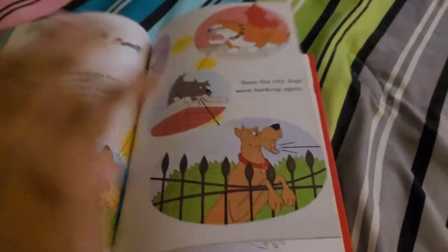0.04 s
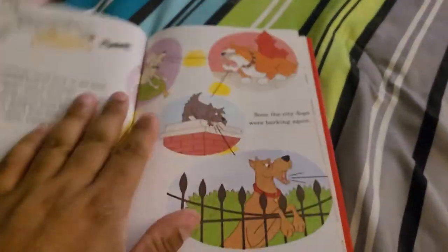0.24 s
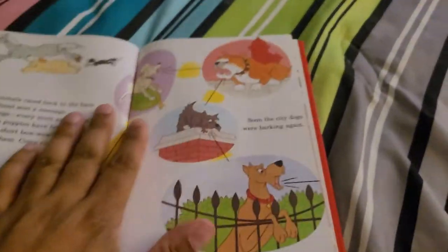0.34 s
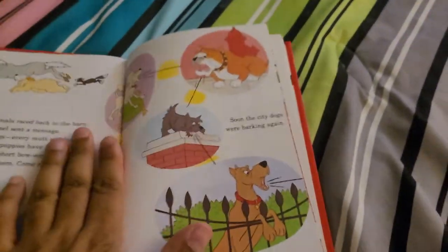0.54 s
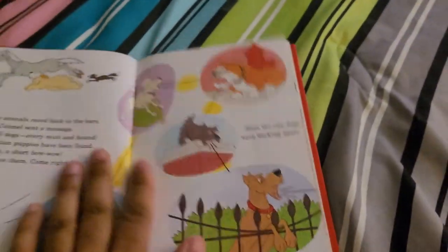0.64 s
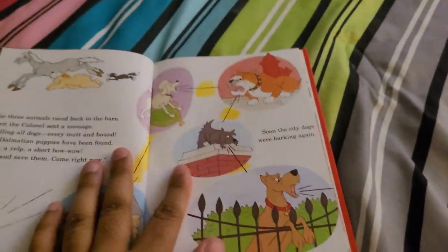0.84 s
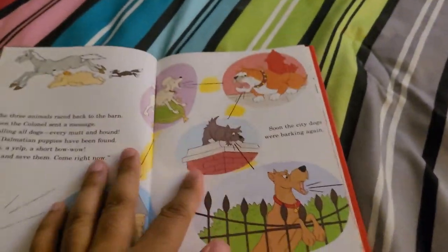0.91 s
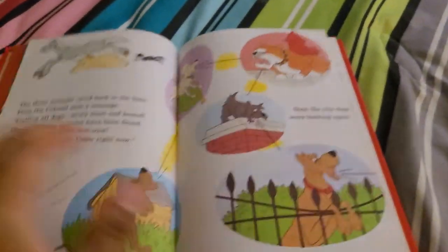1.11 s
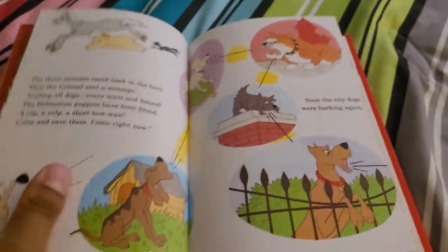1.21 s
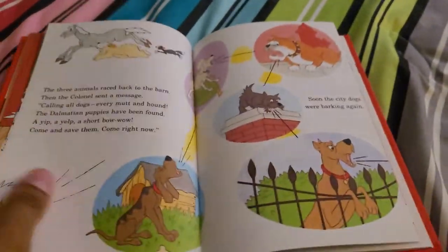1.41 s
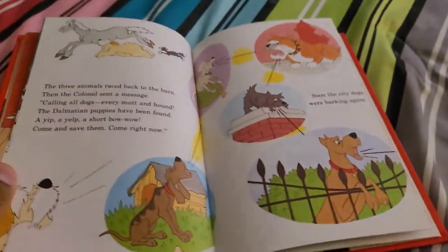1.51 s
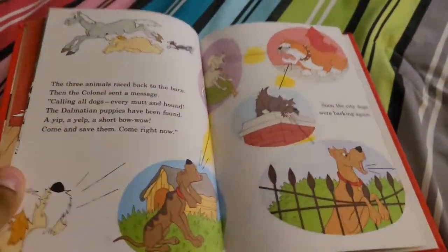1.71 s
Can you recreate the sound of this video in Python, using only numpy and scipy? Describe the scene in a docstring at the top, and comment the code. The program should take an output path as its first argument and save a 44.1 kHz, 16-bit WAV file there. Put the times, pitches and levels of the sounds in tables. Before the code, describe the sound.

Close stereo sound of a book page being turned on a bed: brief paper hiss, one loud bright snap, soft rubbing strokes, then a light papery flex and muffled thumps, over faint room noise with a low hum.

```python
"""A small quiet room, heard from close by: a stiff page of a hardcover book lying on a bed is turned.
It slides, buckles, snaps over and flops down; a hand smooths it in two strokes, then lets go;
the page springs up and the book bumps on the bedding. Snap, ticks and bumps are filtered impulses
and dying sines, flexes are bursts of tiny clicks, and sliding, rubbing, rocking and background
are shaped noise."""
import sys
import numpy as np
from scipy import signal
from scipy.fft import rfft, irfft
from scipy.io import wavfile
from scipy.ndimage import uniform_filter1d, minimum_filter1d

SR = 44100
rng = np.random.default_rng(int(sys.argv[2]) if len(sys.argv) > 2 else 0)


def file_out(sig):
    """Save sig as 16-bit WAV at sys.argv[1]."""
    # one column per channel
    cols = np.atleast_2d(sig).T
    # limit, then scale
    lim = np.clip(cols, -1, 1)
    pcm = np.round(lim * 32767).astype(np.int16)
    wavfile.write(sys.argv[1], SR, pcm)


N = 77175
T = np.arange(N) / SR
CUTOFF_HZ = 16100


def from_db(db):
    """Decibels to gain."""
    return 10 ** (np.asarray(db) / 20)


def rms_one(x):
    """Scale to rms 1."""
    return x / np.sqrt(np.mean(x ** 2) + 1e-20)


def peak_at(x, db):
    """Scale to a peak level."""
    return from_db(db) * x / np.abs(x).max()


def at_hz(points, hz):
    """Read a spectrum on a log-frequency axis."""
    point_hz, value = np.transpose(points)
    return np.interp(np.log(hz + 1), np.log(point_hz), value)


def level(rows):
    """Level curve as gain over time."""
    return from_db(np.interp(T, *np.transpose(rows)))


def flicker(rate_hz):
    """Random drift of spread 1: noise averaged over 1 / rate_hz."""
    size = max(int(SR / rate_hz), 1)
    return rms_one(uniform_filter1d(rng.standard_normal(N), size, mode="wrap"))


def band(x, hz, width):
    """Broad resonance from hz / width to hz * width."""
    width = max(width, 1.05)
    edges_hz = [hz / width, min(hz * width, SR * .45)]
    return signal.sosfilt(signal.butter(2, edges_hz, "band", fs=SR, output="sos"), x + 1e-18)


def click(start_s):
    """Unit impulse."""
    return 1.0 * (np.arange(N) == int(start_s * SR))


def ring(start_s, hz, t60_s):
    """Sine that starts at start_s and decays 60 dB per t60_s."""
    age_s = np.maximum(T - start_s, 0)
    return np.sin(2 * np.pi * hz * age_s) * from_db(-60 * age_s / t60_s)


def grains(rate_per_s, spread_db):
    """Random tiny clicks of uneven size and sign; rms 1."""
    sizes = from_db(spread_db * np.minimum(rng.exponential(1, N), 4))
    signs = rng.choice([-1, 1], N)
    return rms_one(sizes * signs * (rng.random(N) < rate_per_s / SR))


# left-right likeness of the noises: (frequency [Hz], correlation [0..1])
LIKENESS = [(100, 0.89), (400, .88), (1200, 0.27), (2500, 0.38), (5000, 0.18), (13000, 0.15)]


def spread(pair, spectrum):
    """Colour two unrelated excitations and mix them into partly alike channels; rms 1."""
    hz = np.fft.rfftfreq(N, 1 / SR)
    mid, side = rfft(pair)
    alike = np.clip(at_hz(LIKENESS, hz), 0, 1)
    sign = np.array([[1], [-1]])
    gain = from_db(at_hz(spectrum, hz)) * (hz > 34) * (hz < CUTOFF_HZ)
    channels = np.sqrt(1 + alike) * mid + sign * np.sqrt(1 - alike) * side
    return rms_one(irfft(gain * channels, N))


# page snap-through, then edge slap: (time [s], peak [dB], pitch [Hz])
SNAPS = [(0.221, 0, 2740), (.2219, -5, 2210)]
# sheet modes ringing after the snap: (frequency [Hz], drive level re snap [dB], t60 [s])
SHEET_MODES = [(925, -40, .11), (1005, -35, .11), (1168, -34, .13), (1660, -34, .11), (1860, -21, .012),
               (2250, -34, .1), (2420, -16, .010), (3400, -21, .011)]
SNAP_WIDTH, SNAP_TOP_HZ = 1.45, 4400
SHEET_HZ, SHEET_WIDTH = 1900, 2.4


def snap():
    """The bent sheet pops through in one short pulse and is left ringing; its edge slaps just after."""
    lowpass = signal.butter(7, SNAP_TOP_HZ, fs=SR, output="sos")
    pulses = 0
    for start_s, peak_db, hz in SNAPS:
        pulse = signal.sosfilt(lowpass, band(click(start_s), hz, SNAP_WIDTH))
        pulses = pulses + peak_at(pulse, peak_db)
    start_s, peak_db, _ = SNAPS[0]
    ringing = sum(from_db(peak_db + mode_db) * ring(start_s, hz, t60_s)
                  for hz, mode_db, t60_s in SHEET_MODES)
    return pulses + band(ringing, SHEET_HZ, SHEET_WIDTH)


# sheet flexes: (time of middle [s], level [dB], pitch [Hz], half length [s])
FLEXES = [(0.1753, -39, 3520, 0.00086), (0.193, -39, 1110, 0.00093), (0.2, -30.5, 1130, 0.0045),
          (0.231, -40, 2350, 0.0023), (0.2469, -28, 1010, 0.0024), (0.263, -39.5, 890, 0.007),
          (.271, -38, 795, 0.0054), (0.659, -42, 1400, 0.0023), (.809, -63, 8100, 0.003),
          (1.223, -60.5, 1490, 0.0075), (1.309, -46.5, 2350, 0.0011), (1.317, -50.5, 1170, 0.0084),
          (1.339, -44.5, 2780, 0.0027), (1.348, -37, 1160, 0.0028), (1.368, -58, 1830, 0.0053),
          (1.404, -51, 2200, 0.031)]
FLEX_WIDTH, FLEX_CLICKS_PER_S, FLEX_SPREAD_DB = 1.564, 4000, 3


def flexing():
    """Each flex is a swell of tiny creases sounding through the sheet."""
    out = 0
    for middle_s, level_db, hz, half_s in FLEXES:
        swell = np.exp(-.5 * ((T - middle_s) / half_s) ** 2)
        burst = band(grains(FLEX_CLICKS_PER_S, FLEX_SPREAD_DB) * swell, hz, FLEX_WIDTH)
        to_swell_energy = np.sqrt(np.sum(swell ** 2) / (np.sum(burst ** 2) + 1e-20))
        out = out + from_db(level_db) * burst * to_swell_energy
    return out


# skin and paper sliding on paper: (time [s], level [dB])
SLIDE = [(0, -42.5), (.045, -42), (.061, -41), (.069, -44.5), (.10, -58), (.122, -59.5), (.143, -51.5),
         (.168, -66.5), (.184, -42.5), (.218, -66), (.232, -41.5), (.29, -46.5), (.375, -54), (.42, -49),
         (.48, -48.5), (.58, -48.5), (.63, -45.5), (.68, -39.5), (.71, -39.5), (.755, -50), (.778, -69.5),
         (.86, -62), (.94, -58.5), (1.01, -56), (1.065, -48.5), (1.14, -51), (1.158, -63), (1.295, -75),
         (1.34, -52.5), (1.435, -59.5), (1.51, -51.5), (1.595, -54), (1.635, -64), (1.75, -64.5)]
# sliding hiss spectrum: (frequency [Hz], density [dB per Hz])
HISS = [(200, -5), (600, -10), (1300, -2.5), (2400, -1.5), (4500, -3), (6500, -7.5), (8000, -5), (9500, -6),
        (12500, 1.5), (15500, -4)]
# treble of the sliding re the rest of it: (time [s], level [dB])
FIZZ = [(.02, -7), (.06, 4), (.11, -23), (.16, 1), (.24, -1), (.28, -1), (.37, -3.5), (.415, 3.5),
        (.50, -8), (.60, -6.5), (.68, 1.5), (.77, -4), (.81, -2), (1.05, 0.5), (1.14, -4.5), (1.28, -3),
        (1.40, -5.5), (1.51, 0.5), (1.62, -6.5)]
FIZZ_ABOVE_HZ = 8800
GRAINS_PER_S, GRAIN_SPREAD_DB, GRAIN_DB, SLIDE_FLICKER_DB = 5500, 5, -4, 0.86


def sliding():
    """Paper fibres catch and slip: fine grains in a smooth hiss, whose fizzy top comes and goes."""
    slips = np.array([grains(GRAINS_PER_S, GRAIN_SPREAD_DB) for _ in range(2)])
    hiss = spread(rng.standard_normal((2, N)) + from_db(GRAIN_DB) * slips, HISS)
    highpass = signal.butter(4, FIZZ_ABOVE_HZ, "high", fs=SR, output="sos")
    top = signal.sosfiltfilt(highpass, hiss)
    fizzy = hiss - top + top * level(FIZZ)
    return fizzy * level(SLIDE) * from_db(SLIDE_FLICKER_DB * flicker(rate_hz=83))


# finger and page-edge ticks: (time [s], peak [dB], pitch [Hz])
TICKS = [(.056, -34, 885), (.0625, -24.5, 12000), (0.1516, -47, 700), (0.1761, -26, 9200),
         (0.176, -31, 1350), (0.185, -47, 3000), (.2005, -39, 1270), (0.327, -45, 1210), (.344, -38, 1200),
         (.430, -39, 1210), (0.495, -35, 1800), (.4993, -33.5, 775), (.850, -38, 7000), (.880, -46, 850),
         (.929, -43.5, 755), (.949, -47, 1010), (1.078, -40, 980), (1.1769, -39.5, 1160),
         (1.219, -43, 1400), (1.3072, -36, 9050), (1.3143, -39, 1380), (1.3475, -40, 1570)]
TICK_WIDTH = 2


def ticks():
    """Single dead contacts, each an impulse through one broad resonance."""
    return sum(peak_at(band(click(start_s), hz, TICK_WIDTH), peak_db) for start_s, peak_db, hz in TICKS)


# page block rumbling under the hand: (time [s], level [dB])
RUB = [(0, -59), (.06, -58), (.11, -63), (.16, -54.5), (.22, -51.5), (.28, -55), (.33, -61), (.39, -59.5),
       (.47, -57), (.57, -52), (.70, -45), (.79, -61.5), (.89, -67.5), (.94, -50.5), (1.07, -57),
       (1.16, -57), (1.26, -64), (1.34, -49), (1.43, -60.5), (1.58, -70.5), (1.75, -68)]
# page block resonances: (frequency [Hz], density [dB per Hz])
BLOCK = [(35, -17), (70, -34), (100, -13), (140, -3), (185, -5), (250, 1.5), (380, -7), (550, -13.5),
         (1000, -17.5), (2500, -45)]


def rubbing():
    """The dragging hand shakes the low resonances of the page block."""
    return spread(rng.standard_normal((2, N)), BLOCK) * level(RUB)


# soft bumps of page and book: (time [s], peak [dB], pitch [Hz])
BUMPS = [(0.2671, -33, 230), (.273, -38, 124), (0.283, -39.5, 53), (0.4982, -40, 290), (0.989, -41.5, 247),
         (1.077, -42, 214), (1.343, -39.5, 138), (1.385, -34.5, 124), (1.399, -35.5, 215), (1.402, -43, 76),
         (1.412, -38, 132)]
BUMP_WIDTH, BUMP_CYCLES = 2.22, 3.06  # cycles per 60 dB of decay


def bumps():
    """Low thuds that the bedding softens and damps within a few cycles."""
    out = 0
    for start_s, peak_db, hz in BUMPS:
        thud = ring(start_s, hz, BUMP_CYCLES / hz)
        out = out + peak_at(band(thud, hz, BUMP_WIDTH), peak_db)
    return out


# book rocking on the bedding: (time [s], level [dB])
ROCK = [(0, -62), (.10, -84), (.20, -52.5), (.23, -54), (.285, -41.5), (.32, -63), (.365, -56.5),
        (.40, -81), (.60, -67), (.66, -70), (.74, -48.5), (.79, -71), (1.18, -83), (1.27, -65.5),
        (1.31, -51), (1.37, -60), (1.41, -40.5), (1.44, -63), (1.51, -56), (1.57, -78), (1.75, -67)]
# bedding rumble spectrum: (frequency [Hz], density [dB per Hz])
BEDDING = [(30, -16), (45, -5), (70, 7), (92, -11.5), (130, 5), (200, -8), (400, -10.5), (1000, -48)]


def rocking():
    """The shifting book presses into the bedding with a deep, muffled rumble."""
    return spread(rng.standard_normal((2, N)), BEDDING) * level(ROCK)


# room tail colour: (frequency [Hz], level [dB])
ROOM = [(60, -18), (300, -14), (1000, 3), (2300, -3), (4000, -7.5), (8000, 3.5), (15000, 4)]
ROOM_DB, ROOM_T60_S, ROOM_DELAY_S = -8, 0.22, .005


def room(x):
    """Short diffuse tail of decaying noise, unrelated at the two microphones."""
    colour = from_db(at_hz(ROOM, np.fft.rfftfreq(N, 1 / SR)))
    noise = irfft(rfft(rng.standard_normal((2, N))) * colour, N)
    tail = noise * (T > ROOM_DELAY_S) * from_db(-60 * T / ROOM_T60_S)
    tail = tail / np.sqrt(np.sum(tail ** 2) / 2)  # mean energy 1 per channel
    return from_db(ROOM_DB) * signal.fftconvolve(x[None], tail, axes=1)[:, :N]


# room noise spectrum: (frequency [Hz], density [dB per Hz])
FLOOR = [(30, -12), (60, 0), (140, 0.5), (300, -9), (600, -12), (1200, -4), (1800, -8), (2350, -0.5),
         (3000, -12.5), (4000, -9), (8000, -18.5), (15000, -42)]
FLOOR_DB, HUM_DB, HUM_HZ, HUM_WIDTH = -64.5, -66, 144, 1.06


def background():
    """Faint room noise with a low drone of narrow-band noise."""
    drone = rms_one(band(rng.standard_normal(N + SR), HUM_HZ, HUM_WIDTH)[SR:])  # skip filter onset
    return from_db(FLOOR_DB) * spread(rng.standard_normal((2, N)), FLOOR) + from_db(HUM_DB) * drone


# microphone balance: (frequency [Hz], left minus right [dB])
BALANCE = [(100, 0), (700, .5), (1400, -2.5), (2600, -4), (4500, -3.5), (8000, -3), (13000, -7)]
RIGHT_LAG_S = .00013


def microphones(x):
    """The right microphone is brighter and hears everything a little later."""
    hz = np.fft.rfftfreq(2 * N, 1 / SR)
    tilt = from_db(at_hz(BALANCE, hz) / 2)
    lag = np.exp(-2j * np.pi * hz * RIGHT_LAG_S)
    return irfft(rfft(x, 2 * N) * np.array([tilt, lag / tilt]))[:, :N]


def scene():
    """Paper, hand and book in the room; only snap, flexes and ticks feed the tail."""
    paper = snap() + flexing() + ticks()
    return microphones(paper + room(paper) + sliding() + rubbing() + bumps() + rocking() + background())


LIMIT, LIMITER_S = .97, .001


def record(dry):
    """A fast limiter holds the peak under full scale, then the top is cut."""
    size = int(LIMITER_S * SR)
    allowed = LIMIT / np.maximum(np.abs(dry).max(0), LIMIT)
    gain = uniform_filter1d(minimum_filter1d(allowed, size=size), size=size)
    lowpass = signal.cheby2(16, 50, CUTOFF_HZ + 600, fs=SR, output="sos")
    return signal.sosfiltfilt(lowpass, dry * gain)


dry = scene()
out = record(dry)
file_out(out)
```